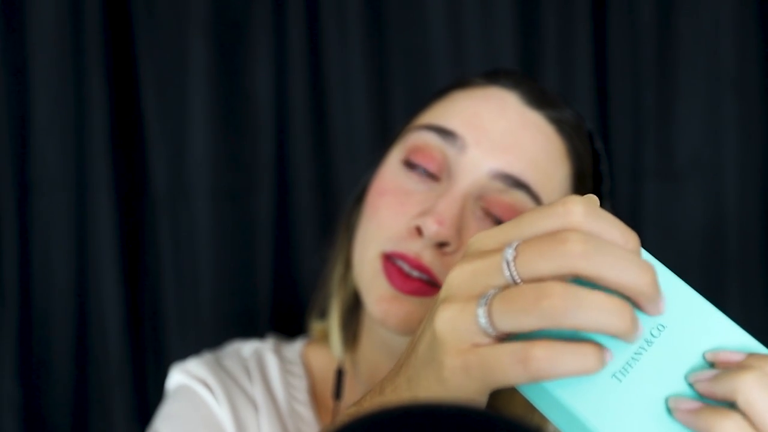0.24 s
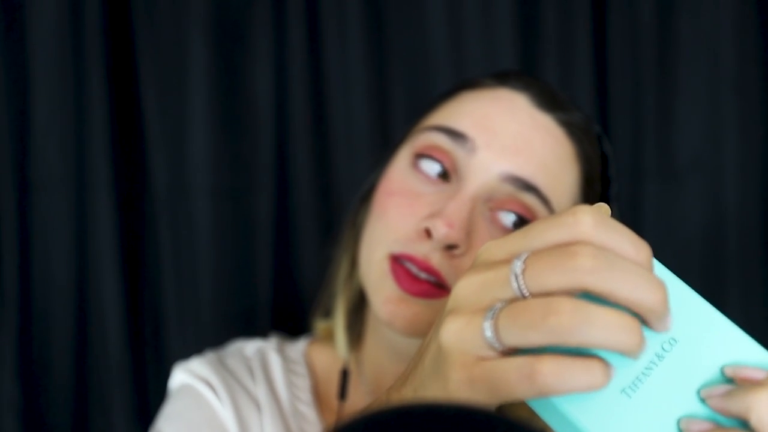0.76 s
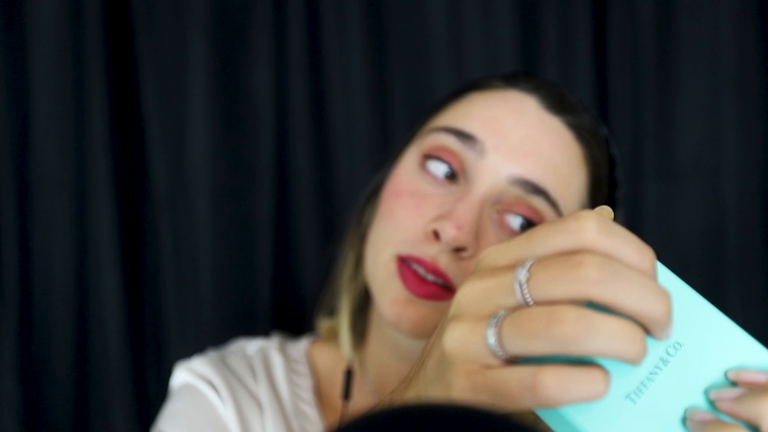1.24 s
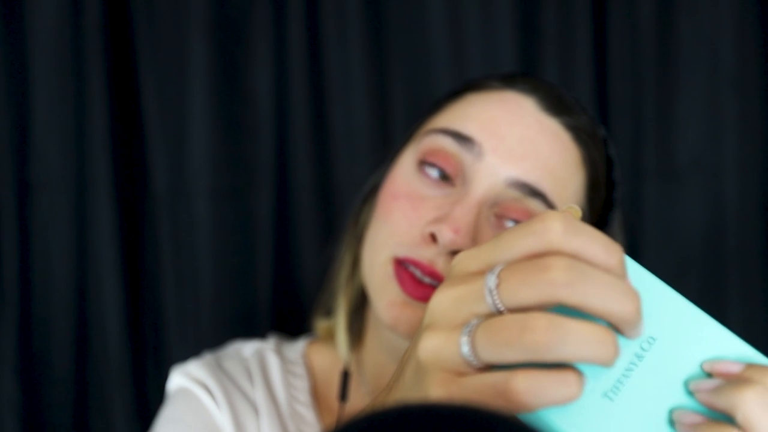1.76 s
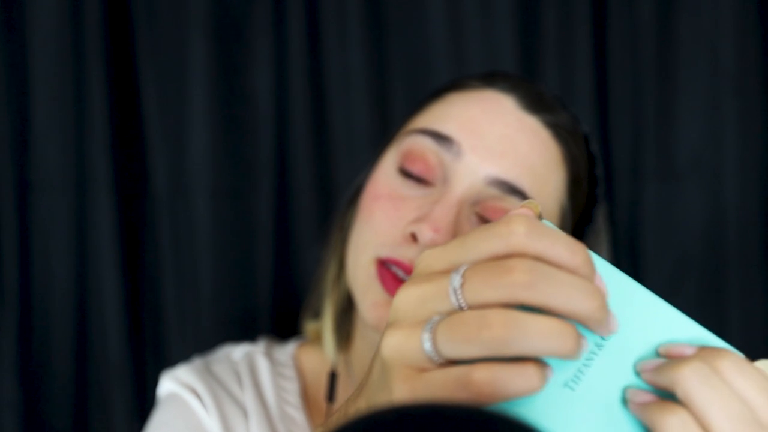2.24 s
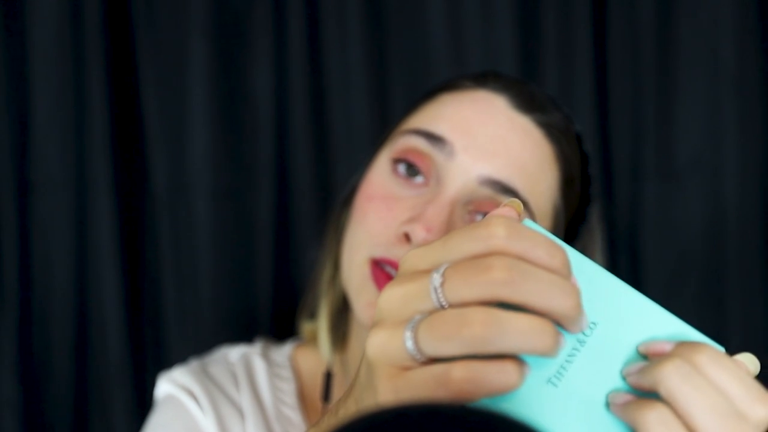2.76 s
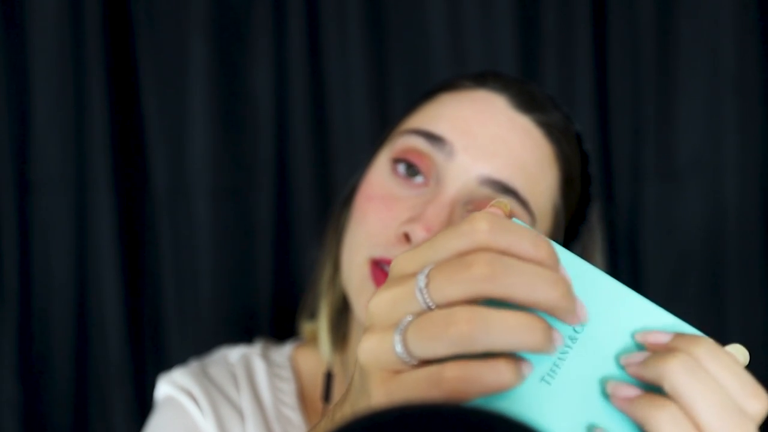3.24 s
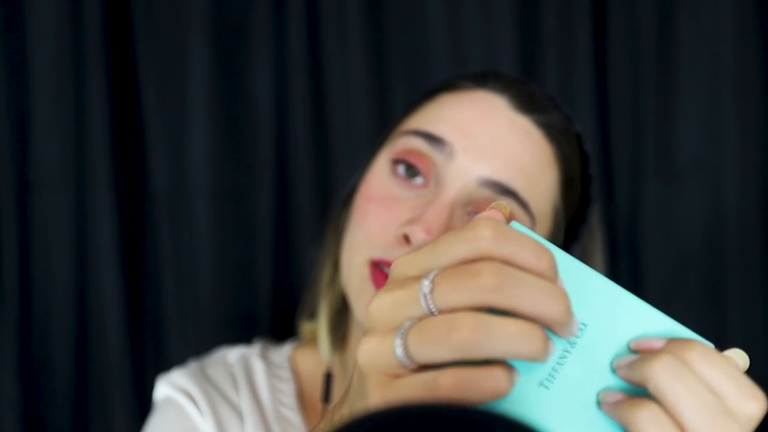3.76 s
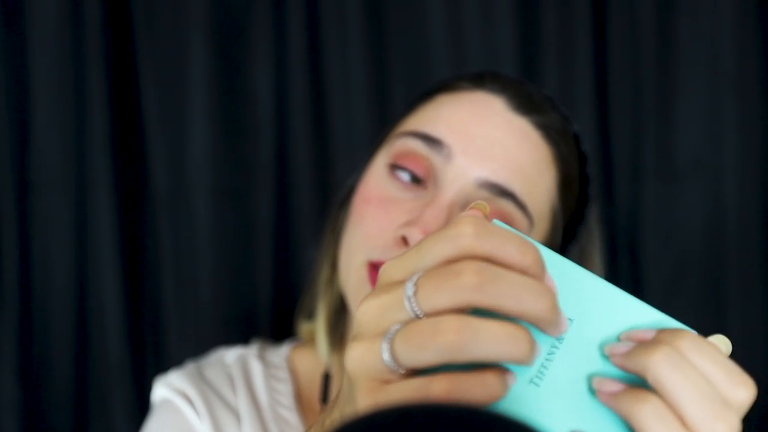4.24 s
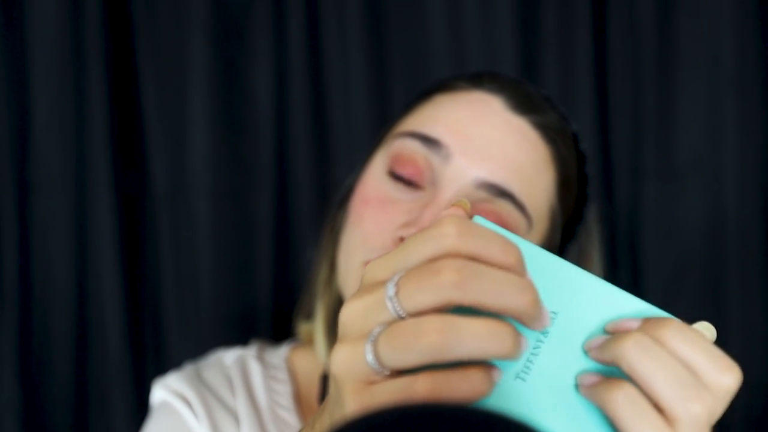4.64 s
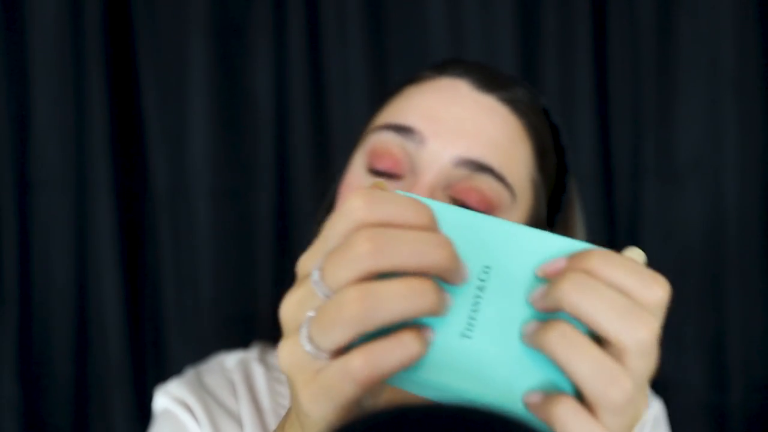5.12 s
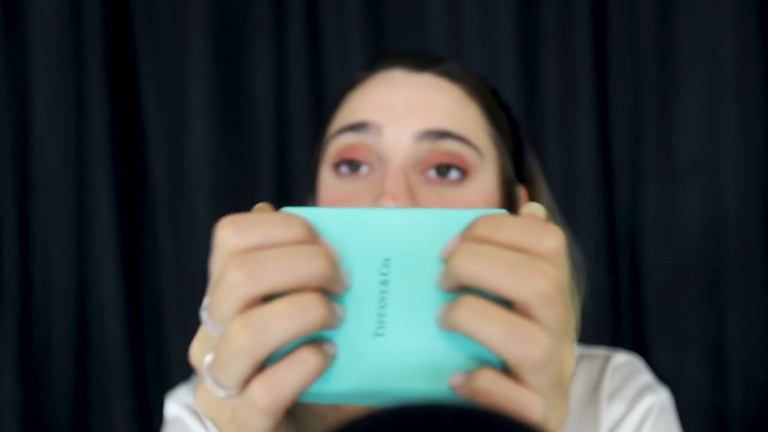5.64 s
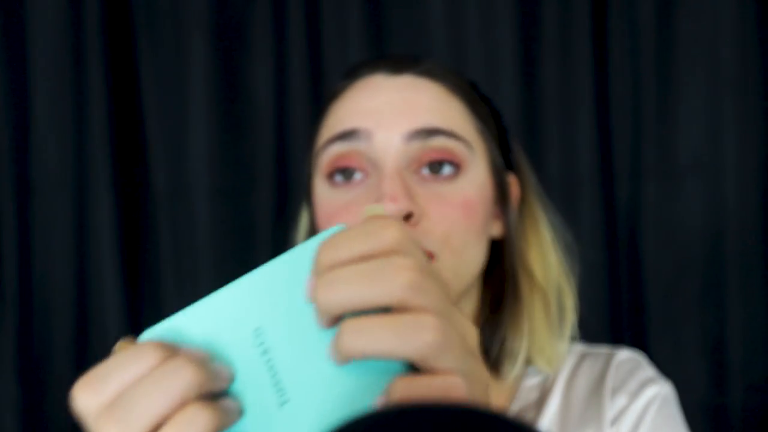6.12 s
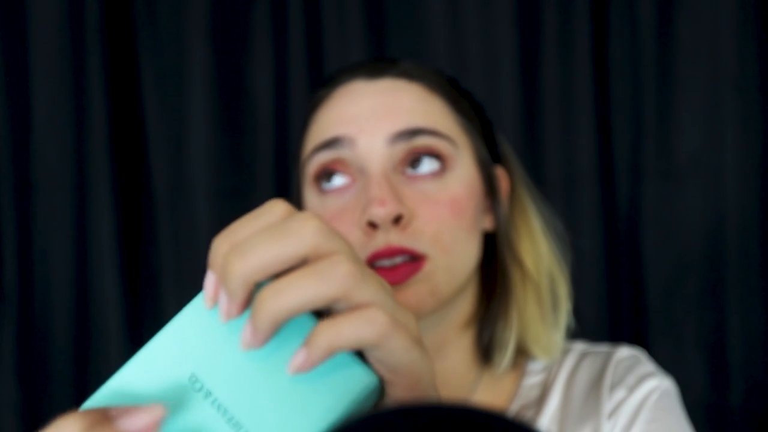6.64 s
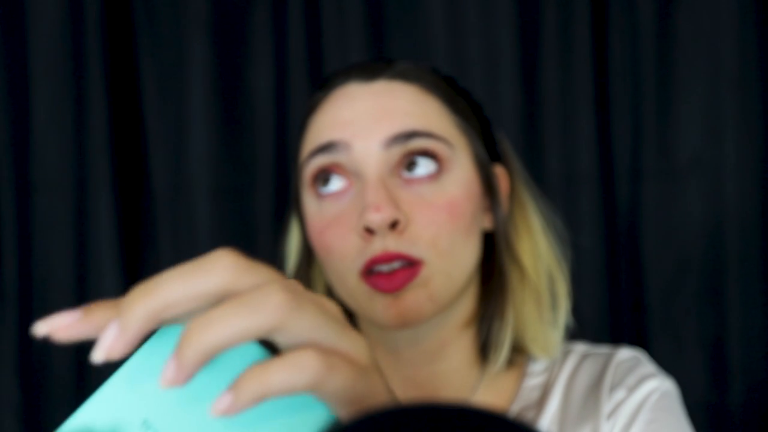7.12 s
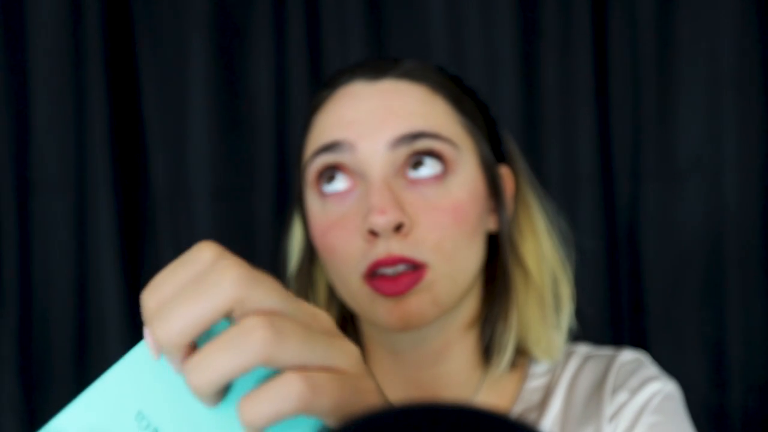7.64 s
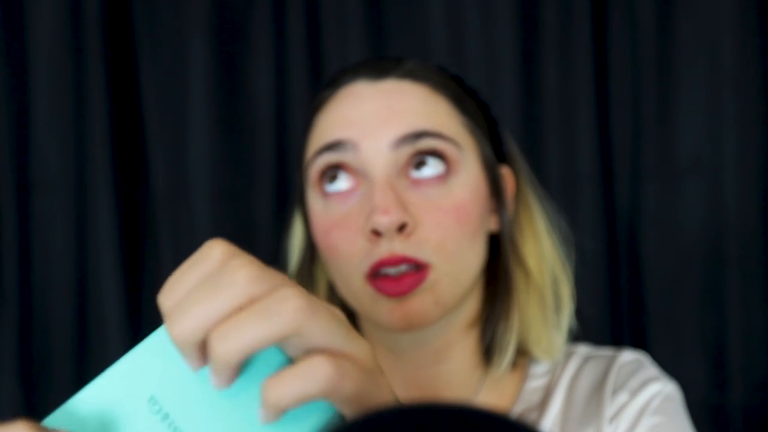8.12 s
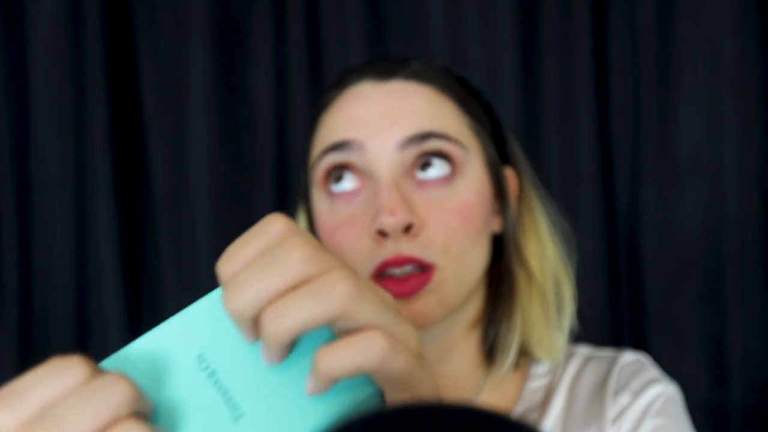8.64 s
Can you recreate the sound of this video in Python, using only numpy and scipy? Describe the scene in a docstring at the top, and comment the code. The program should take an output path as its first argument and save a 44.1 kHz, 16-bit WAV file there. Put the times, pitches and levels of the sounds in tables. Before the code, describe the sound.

Long fingernails tap and scratch a small cardboard box close to a stereo microphone, moving from right to left in a quiet room

```python
"""Long fingernails tap a small cardboard box held close to a stereo microphone in a quiet, curtained room.
Each nail excites the box's broad, quickly damped modes. At first the box lies to the right, with short scrapes
and faint dull swells between taps; then taps crowd together, and it crosses to the left with thuds of the
shifting grip. Papery, airy brushing fills a lull before the last, loudest taps. Scrapes and swells are filtered
random clicks; a short room made of feedback delays, low rumble and hiss, both filtered noise, lie below."""
import sys
import numpy as np
from scipy import signal
from scipy.fft import rfft, irfft, next_fast_len
from scipy.io import wavfile

SR = 44100
rng = np.random.default_rng(int(sys.argv[2]) if len(sys.argv) > 2 else 0)


def file_out(sig):
    """Save sig as 16-bit WAV at sys.argv[1]."""
    # one column per channel
    cols = np.atleast_2d(sig).T
    # limit, then scale
    lim = np.clip(cols, -1, 1)
    pcm = np.round(lim * 32767).astype(np.int16)
    wavfile.write(sys.argv[1], SR, pcm)


N = 391605


def from_db(db):
    """Level: decibels become an amplitude gain."""
    return 10 ** (np.asarray(db) / 20)


def rms_one(x):
    """Normalisation: scale to an rms of 1."""
    return x / np.sqrt(np.mean(x ** 2) + 1e-20)


def drift(rate_hz):
    """Slow fluctuation: noise through a double-pole lowpass, scaled to rms 1."""
    step = 40   # samples between computed points
    r = np.exp(-2 * np.pi * rate_hz * step / SR)
    white = rng.standard_normal(N // step + 2002)
    slow = signal.lfilter([1], [1, -2 * r, r * r], white)[2000:]   # the filter's onset is dropped
    return np.interp(np.arange(N) / step, np.arange(len(slow)), rms_one(slow))


def ring(clicks, hz, t60_s):
    """Damped resonance: a unit click starts a decaying sine of height 1."""
    r = from_db(-60 / (t60_s * SR))
    w = 2 * np.pi * hz / SR
    return signal.lfilter([0, np.sin(w)], [1, -2 * r * np.cos(w), r * r], clicks + 1e-18)


def coloured(white, spectrum):
    """Spectral shaping: weight white input by a curve over log frequency; rms 1."""
    size = next_fast_len(N)
    hz, level_db = np.transpose(spectrum)
    bins_hz = np.fft.rfftfreq(size, 1 / SR)
    curve_db = np.interp(np.log(bins_hz + 1), np.log(hz), level_db, left=-60, right=-60)
    return rms_one(irfft(rfft(white, size) * from_db(curve_db), size)[..., :N])


def pair(likeness):
    """Interchannel correlation: left and right noise share a mid and oppose in a side part."""
    mid, side = rng.standard_normal((2, N))
    likeness = np.clip(likeness, 0, 1)
    return np.sqrt(1 + likeness) * mid + np.sqrt(1 - likeness) * side * [[1], [-1]]


def grains(per_s, spread_db):
    """Granular noise: random clicks of uneven size, like tiny slips of skin on card."""
    sizes = from_db(spread_db * np.minimum(rng.exponential(1, N), 4)) * rng.choice([-1, 1], N)
    return sizes * (rng.random(N) < per_s / SR)


# Nail strokes on the lid; knock and tick are relative to the click:
# start_s [s], click_db [dB], knock_db [dB], tick_db [dB]
NAIL_TAPS = [(0.0154,-40,13,-10),(.1039,-29,-5,-17),(0.1725,-26.5,8.5,-7),(0.1818,-31,2,-0.5),(0.2465,-43,3,-14),(0.4127,-34,2.5,-8.5),
             (.4781,-27.5,-8.5,1.5),(.5306,-32.5,11,-2),(0.6344,-37.5,16.5,-26),(0.6887,-36.5,3,-11),(.6996,-35,-4,-2.5),(0.8729,-32.5,-5,-12),
             (.9583,-40.5,9,2.5),(0.9702,-28,6.5,-7.5),(1.1127,-37.5,9,-9),(1.1294,-29,-10,-4),(1.1325,-25,-24,-4),(1.2909,-37.5,17.5,-5),
             (1.328,-37,12,-3),(1.409,-33.5,12.5,0.5),(1.4621,-28,5,0.5),(1.516,-29,-1.5,-13),
             (1.5619,-38.5,2.5,2),(1.5862,-31.5,2.5,-1),(1.7351,-29,-5,-15),(1.7829,-23,-9,-0.5),(1.8774,-29,5.5,-11.5),(1.9431,-19.5,-11,-9.5),
             (1.9628,-29.5,6,-8),(2.02,-31.5,-9,-2.5),(2.1172,-53,14,4),(2.2866,-33,-1,-12),(2.3864,-40,14,-3),(2.422,-38,7,-8),
             (2.4836,-45,7,2),(2.5106,-44,10.5,-6),(2.5312,-35,-9,-5),(2.664,-39,-2,-6.5),(3.0559,-44,-14,-5),(3.4356,-30.5,-0.5,-9),
             (3.531,-35,5,-10),(3.5774,-32,-6,-7.5),(3.6532,-37.5,4,-7),(3.712,-49.5,14,-11),(3.7883,-32,-2.5,-9),(3.8768,-37.5,-19,-4),
             (4.2586,-26.5,3.5,-6),(4.352,-18,-10.5,-7.5),(4.3821,-29.5,4,-19),(4.4781,-29,11,-11),(4.5256,-42,17,-19),(4.5491,-23,-7,-16),
             (4.6472,-28.5,9,-2),(4.713,-53,19,-9),(4.7702,-23.5,-2.5,-9.5),(4.8246,-23,1.5,-11.5),(4.9388,-25.5,4.5,-8),
             (5.0512,-24.5,-9,-9),(5.2215,-28,3,-10),(5.3008,-24.5,-8,-10.5),(5.3341,-19,0,-14),(5.34,-27,13.5,-6.5),(5.4384,-19,-1.5,-15.5),
             (5.49,-29.5,0,-8),(5.6065,-32,-8,-2.5),(5.6263,-33,1.5,-6),(5.6997,-20,-7,-13),(5.7311,-18.5,0.5,-16),(5.774,-20,0.5,-8.5),
             (5.844,-19.5,0,-15),(5.9025,-24,-0.5,-10),(5.9245,-19.5,-11,-8),(6.0802,-23,2,-8),(6.174,-30,-3,-4.5),(6.2098,-37,4.5,2),
             (6.2343,-23,4,-11),(6.2404,-23.5,1,-20),(6.332,-24,0.5,-12),(6.3649,-48,15,10),(6.409,-32,5.5,2),(6.5504,-41,-1,-8),
             (6.6806,-42,-6,12.5),(6.6879,-42,10.5,12),(6.8683,-42,5.5,0.5),(6.9563,-41,1,-10),(6.988,-38,-4,-8),(7.344,-46.5,-6,-2),
             (7.5743,-21,6.5,-4),(7.7208,-29,6,-7.5),(7.85,-39,9,-8),(7.872,-30,7,-12),(7.9045,-17,-4,-13),(7.9293,-20,-6,-7),
             (8.0261,-42,7.5,-15),(8.1511,-53,-9,10),(8.172,-48,1,8),(8.1783,-23,-7.5,-7.5),(8.338,-45,16.5,-4),(8.343,-32.5,8,0),
             (8.404,-13.5,1.5,-5.5),(8.4105,-31.5,3,-8),(8.497,-20,-4.5,-2.5),(8.515,-17,6,-5),(8.6349,-25.5,-3.5,-2.5),(8.7034,-36.5,-3,-6),(8.7754,-31.5,10.5,-10)]
# Modes of the box, levels relative: pitch_hz [Hz], level_db [dB], t60_s [s]
BOX_MODES = [(326, -92, 0.014), (557.5, -11.5, 0.025), (737, -2, 0.01), (1059, -14.5, 0.02),
             (1365, 1.5, 0.0038), (2074, -2.5, 0.0045), (2670, -7, 0.0054), (3560, -1, 0.0027),
             (4870, 0, 0.0016), (7390, -1.5, 0.0011), (9140, -14.5, 0.0035), (12200, -2.5, 0.0004)]
CONTACT_HZ = 3390   # the nail's pad of contact softens all but the tick
TICK_SPREAD_S = 0.001   # tick modes start at small random delays, giving a slightly smeared tick
SLAP_FOLLOWS = 0.44   # share of a tap's knock_db that the lid slap takes over


def taps():
    """Modal excitation: a nail pushes the lid and rings all modes, weighted by where it lands."""
    start_s, click_db, knock_db, tick_db = np.transpose(NAIL_TAPS)
    at = np.round(start_s * SR).astype(int)
    _, turned_db, depth_db, tilt_db, _ = carried()
    slap_db = SLAP_FOLLOWS * knock_db + turned_db[at]
    landing_db = 2.7 * rng.standard_normal((len(at), len(BOX_MODES)))
    tick_sign = rng.choice([-1, 1], (len(at), len(BOX_MODES)))
    # a close reflection at a random short delay notches each tap differently
    echo = at + (rng.uniform(.0004, .0014, len(at)) * SR).astype(int)
    echo_share = rng.uniform(.1, .45, len(at))
    body, tick = 0, 0
    for k, (hz, level_db, t60_s) in enumerate(BOX_MODES):
        if hz < 900:   # hollow knock
            part_db = knock_db + depth_db[at] * (.5 if hz < 640 else -.5)
        elif hz < 1700:   # lid slap
            part_db = slap_db
        else:   # click, and above 3300 Hz the nail's tick
            part_db = (tick_db if hz > 3300 else 0) + tilt_db[at] * abs(np.log2(hz / 3100))
        clicks = np.zeros(N)
        clicks[at] = -from_db(click_db + level_db + part_db + landing_db[:, k])
        clicks[echo] += echo_share * clicks[at]
        if hz > 3300:
            clicks[at] *= tick_sign[:, k]
            late = round(TICK_SPREAD_S * SR * rng.random())
            tick = tick + ring(np.roll(clicks, late), hz, t60_s)
        else:
            body = body + ring(clicks, hz, t60_s)
    body = signal.sosfilt(signal.butter(5, CONTACT_HZ, fs=SR, output="sos"), body)
    # the taps carry little sound below about 245 Hz
    return signal.sosfilt(signal.butter(4, 245.0, "high", fs=SR, output="sos"), body + tick)


# Finger slides and short scrapes on the box, with slow faint dull swells of room and background
# between taps; levels before the random unevenness:
# peak_s [s], length_s [s], drag_db [dB], scuff_db [dB], brush_db [dB]
SCRAPES_AND_SWELLS = [(0.21, 0.21, -55, -61, -68), (0.803, 0.039, -64, -65, -63.5),
                      (1.325, 0.013, -43.5, -72, -70), (1.344, 0.019, -50, -65, -72),
                      (1.378, 0.011, -44, -75, -73), (1.407, 0.0069, -40, -62, -62),
                      (1.434, 0.01, -34, -62, -62), (1.443, 0.43, -56.5, -72, -74),
                      (1.561, .02, -57, -55, -63), (2.122, 0.046, -55, -79, -78),
                      (2.61, 0.74, -60.5, -74, -80), (3.064, .38, -53.5, -63.5, -69.5),
                      (3.202, 0.082, -53.5, -70, -66), (3.88, 0.15, -53.5, -79, -78),
                      (3.998, 0.17, -50.5, -59.5, -63), (4.712, 0.54, -57, -95, -76),
                      (5.037, .04, -51, -62, -63), (5.143, 0.035, -54, -68, -72),
                      (5.06, 0.38, -61.5, -77, -81), (5.416, 0.4, -61, -71, -71),
                      (6.035, 0.22, -58.5, -75, -78), (6.226, 0.15, -64, -74, -61),
                      (6.323, 0.12, -53, -72, -52.5), (6.401, 0.11, -54, -60, -60),
                      (6.528, 0.094, -53.5, -54, -67.5), (6.68, 0.039, -74, -52.5, -51),
                      (6.747, 0.32, -85, -66, -62), (6.925, 0.073, -64, -75, -59.5),
                      (7.018, .11, -60.5, -63, -53), (7.221, .11, -61, -50.5, -50.5),
                      (7.369, 0.076, -86, -74, -61), (7.632, 0.13, -56, -78, -80),
                      (8.016, 0.06, -57, -69, -82), (8.175, 0.052, -60, -72, -58),
                      (8.51, 0.41, -59, -77, -82)]
# Spectrum of the dull part: pitch_hz [Hz], level_db [relative dB per Hz]
DRAG_SPECTRUM = [(150, -11), (250, -9), (520, 0), (750, -3.5), (1300, -11), (2500, -20.5), (5000, -41)]
# Spectrum of the papery scuff: pitch_hz [Hz], level_db [relative dB per Hz]
SCUFF_SPECTRUM = [(600, -28), (1050, 6.5), (1500, -3.5), (2200, 1.5), (3300, -5.5), (4500, -15),
                  (9000, -32)]
# Spectrum of the airy brush: pitch_hz [Hz], level_db [relative dB per Hz]
BRUSH_SPECTRUM = [(2500, 4), (4500, -0.5), (7500, 1.5), (12500, -0.5), (14000, -7), (16000, 5)]
SWELL_SHARE = 0.53   # part of each row's length spent swelling; the rest fades


def scrapes_and_swells():
    """Granular friction noise: dense clicks in dull, papery and airy bands swell and fade."""
    levels = np.zeros((3, N))
    for peak_s, length_s, *level_db in SCRAPES_AND_SWELLS:
        start_s = peak_s - SWELL_SHARE * length_s
        end_s = peak_s + (1 - SWELL_SHARE) * length_s
        at = np.arange(round(start_s * SR), min(round(end_s * SR), N))
        rise_and_fall = np.interp(at / SR, [start_s, peak_s, end_s], [0, 1, 0])
        swell = np.sin(np.pi / 2 * rise_and_fall) ** 0.9
        levels[:, at] += np.outer(from_db(level_db), swell)
    uneven = drift(62)
    catches = grains(1500, spread_db=2.0)   # the same catches feed the dull and papery parts
    papery = rms_one(catches) + rms_one(grains(7100, spread_db=0.0))
    airy = grains(12000, spread_db=-0.5)
    drag = from_db(2.6 * uneven) * coloured(catches, DRAG_SPECTRUM)
    scuff = from_db(2.5 * uneven) * coloured(papery, SCUFF_SPECTRUM)
    brush = from_db(1.2 * uneven) * coloured(airy, BRUSH_SPECTRUM)
    return np.sum(levels * [drag, scuff, brush], axis=0)


# The grip shifts, levels before placing left and right: start_s [s], level_db [dB]
GRIP_SHIFTS = [(4.35, -38.5), (4.857, -35.5), (5.041, -37), (5.729, -37), (6.175, -33), (6.236, -39),
               (6.408, -30.5), (6.68, -31), (6.868, -43)]


def thuds():
    """Impulse response: a soft low push at each regrip rings three low resonances."""
    start_s, level_db = np.transpose(GRIP_SHIFTS)
    clicks = np.zeros(N)
    clicks[np.round(start_s * SR).astype(int)] = -from_db(level_db)
    return ring(clicks, 48.0, 0.15) + ring(clicks, 100, 0.066) + 0.2 * ring(clicks, 220, 0.028)


# Spectrum of palms on card: pitch_hz [Hz], level_db [relative dB per Hz]
HANDLING_SPECTRUM = [(40, 8.5), (70, 4), (150, -6), (300, -14.5), (500, -28)]


def handling():
    """Modulated noise: palms shifting on the card give a lumpy low murmur."""
    level_db = carried()[-1] + 5.4 * drift(11)
    return from_db(level_db) * coloured(rng.standard_normal(N), HANDLING_SPECTRUM)


# The box carried across and turned; place is left over right, depth is low knock over high knock,
# tilt is per octave away from 3.1 kHz, handling is before its random lumps and placing:
# start_s [s], place_db [dB], slap_db [dB], depth_db [dB], tilt_db [dB per octave], handling_db [dB]
BOX_PATH = [(0.0, -6.5, 3.5, -1.5, 0.5, -73), (4.0, -5, 6, -3.5, 1.5, -66.5),
            (5.3, -2, -1.5, -0.5, 1.5, -60.5), (5.9, 3.5, -1.5, -3, 0, -59),
            (6.2, 4.5, -7.5, 2.5, -0.5, -45), (6.55, 6, -5, -4, 0, -59.5), (6.72, 5.5, -13, 1, 2, -52),
            (7.1, 5, -7, -3, 2, -58), (7.5, 8, -4, 10, -2.5, -65), (8.88, 7, -6.5, -9.5, -6, -62.5)]


def carried():
    """Moving source: place and timbre glide linearly in dB between the table's rows."""
    start_s, *columns = np.transpose(BOX_PATH)
    return [np.interp(np.arange(N) / SR, start_s, column) for column in columns]


ROOM_T60_S, WALL_CUT_HZ, ROOM_DB = 0.25, 7000, -17.5


def room(x):
    """Reverberation: eight feedback delays a side, first from hands and table, duller each round."""
    out = np.zeros((2, N))
    dull = np.exp(-2 * np.pi * WALL_CUT_HZ / SR)
    for k, lag in enumerate((np.geomspace(.0041, .037, 16) * SR).astype(int)):
        loop, state = x.copy(), [0.]
        gain = from_db(-60 * lag / SR / ROOM_T60_S)
        for i in range(lag, N, lag):
            back, state = signal.lfilter([gain * (1 - dull)], [1, -dull], loop[i - lag:i], zi=state)
            loop[i:i + lag] += back[:N - i]
        # short loops build up more, so they are weighted down
        weight = (lag / SR / 0.09) ** 0.29
        out[k % 2] += (loop - x) * (-1) ** (k // 2) * weight
    # long waves are reinforced and reach both capsules alike
    band = signal.butter(2, [300.0, 850.0], "band", fs=SR, output="sos")
    return out + from_db(0.5) * signal.sosfilt(band, out.mean(axis=0))


# Spectrum of the low rumble: pitch_hz [Hz], level_db [relative dB per Hz]
RUMBLE_SPECTRUM = [(4.7, -21), (8.0, 16), (26, 8.5), (155, -18.5), (250, -25), (320, -19.5), (550, -120)]
RUMBLE_DB, RUMBLE_WAVERS_DB = -43, 1.5   # middle level and rms wavering


def rumble():
    """Partly correlated noise: a low background whose level wavers."""
    level_db = RUMBLE_DB + RUMBLE_WAVERS_DB * drift(4.2)
    return from_db(level_db) * coloured(pair(0.3), RUMBLE_SPECTRUM)


# Spectrum of the microphone hiss: pitch_hz [Hz], level_db [relative dB per Hz]
HISS_SPECTRUM = [(88, -26), (150, 1.5), (530, 1.5), (608, -3), (1610, -11), (2710, -12.5), (4240, -15.5),
                 (11700, -17), (15600, -15)]
HISS_DB = -58.5


def hiss():
    """Self-noise: steady noise, nearly independent in the two capsules."""
    return from_db(HISS_DB) * coloured(pair(0.056), HISS_SPECTRUM)


def scene():
    """Superposition: the box placed by level difference, over room, rumble and hiss."""
    place_db = carried()[0]
    sides = from_db(np.outer([.5, -.5], place_db))   # left, right
    box = taps() + scrapes_and_swells()
    # handling travels through the nearer side, so its level difference is doubled
    near = box * sides + (thuds() + handling()) * sides ** 2
    return near + from_db(ROOM_DB) * room(box) + rumble() + hiss()


CUTOFF_HZ = 15900


def record(dry):
    """Band limiting: a steep lowpass removes the top."""
    lowpass = signal.cheby2(12, 70, CUTOFF_HZ + 500, fs=SR, output="sos")   # 70 dB down from this edge
    return signal.sosfilt(lowpass, dry)


dry = scene()
out = record(dry)
file_out(out)
```